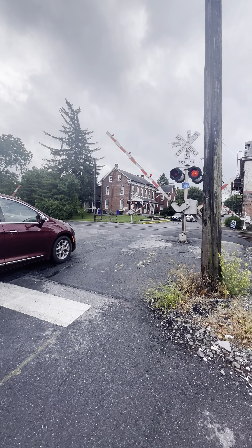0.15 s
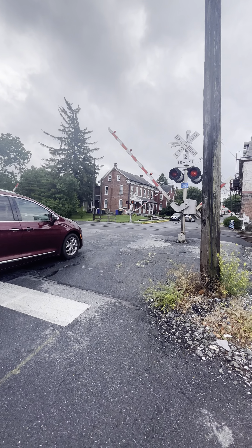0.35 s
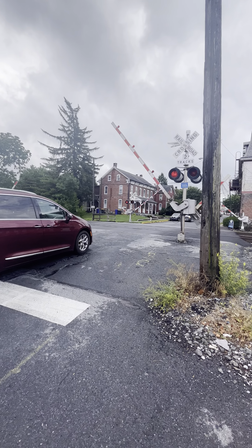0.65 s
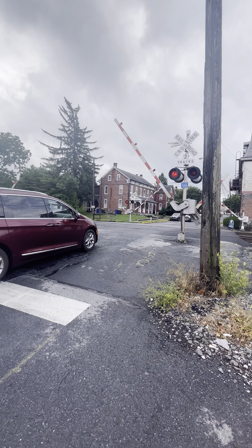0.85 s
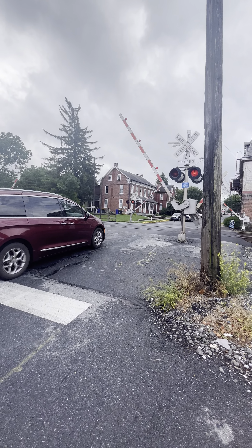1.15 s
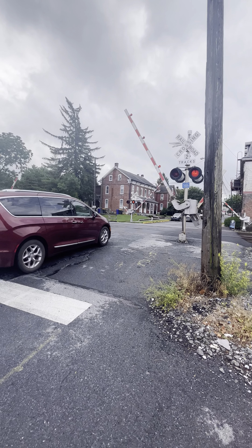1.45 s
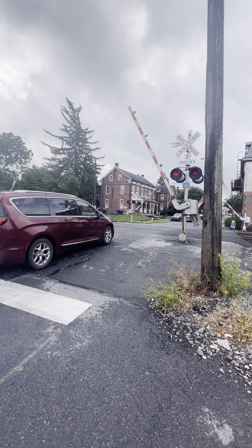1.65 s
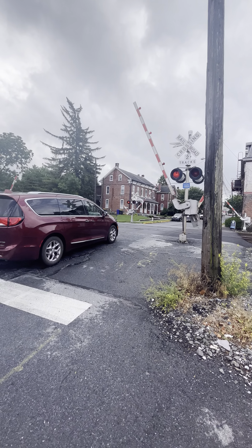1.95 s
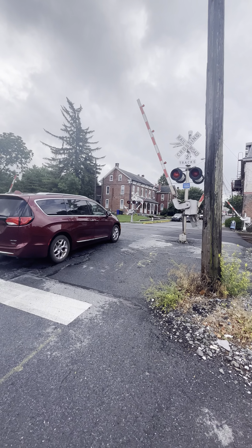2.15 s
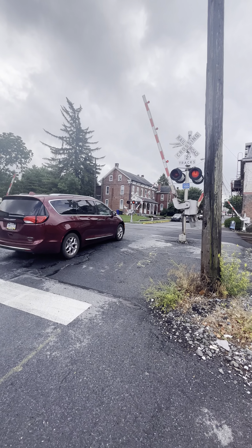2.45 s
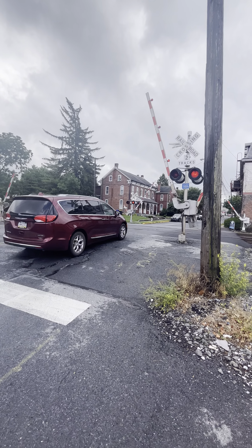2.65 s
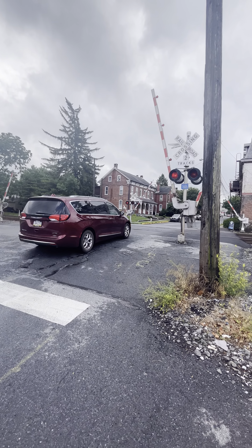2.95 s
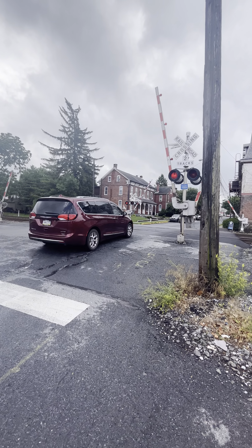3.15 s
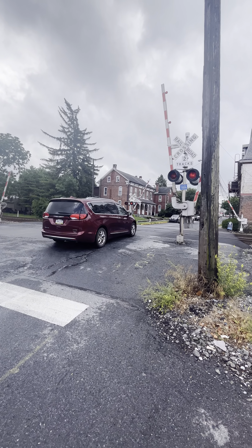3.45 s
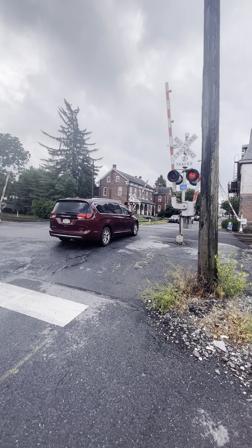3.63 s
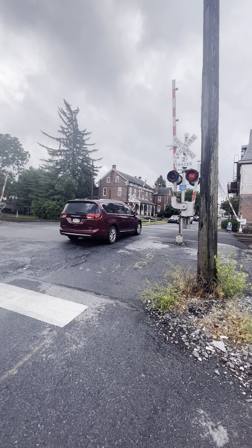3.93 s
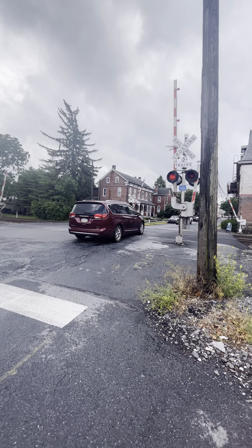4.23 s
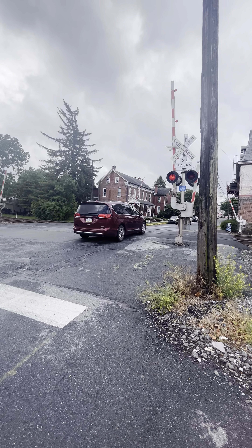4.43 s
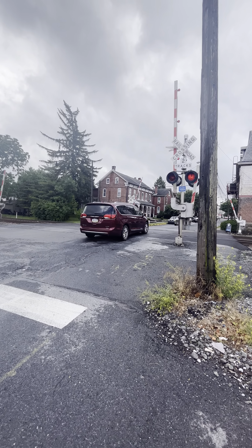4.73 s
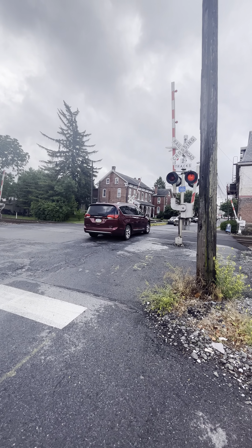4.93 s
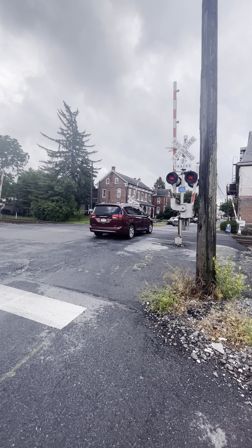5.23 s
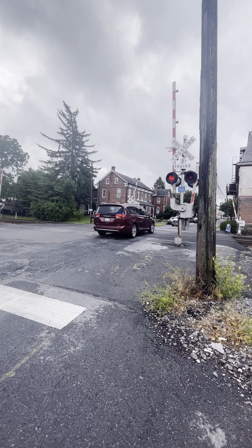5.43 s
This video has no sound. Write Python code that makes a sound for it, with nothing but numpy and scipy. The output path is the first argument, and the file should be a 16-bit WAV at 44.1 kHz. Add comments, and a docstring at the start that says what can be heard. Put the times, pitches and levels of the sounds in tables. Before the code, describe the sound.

A van pulls away over a damp level crossing with wet tyre hiss, low rumble and a throbbing engine, then gravel crunches close by.

```python
"""From the start, tyres roar and hiss on damp asphalt, low rumble and booms come from a crossing, a low note
near 62 Hz swells now and then, and a motor hums. Metal squeaks early, and again from about 3 to 3.8 s. At 1.7 s
a van pulls away, its firing note climbing, then fading. From then on an eight-cylinder engine pulls at low revs
beside a low drone, gas rushes softly, and grit ticks now and then. Near the end loose metal clinks twice and
gravel crunches once, close to the two microphone ports. Tyres and stones are shaped noise; engines, hum,
squeaks and rings are sine waves with small random changes."""
import sys
import numpy as np
from scipy import signal
from scipy.fft import rfft, irfft, next_fast_len
from scipy.io import wavfile
from scipy.ndimage import uniform_filter1d, map_coordinates

SR = 44100
rng = np.random.default_rng(int(sys.argv[2]) if len(sys.argv) > 2 else 0)


def to_wav(s):
    """Save 16-bit WAV."""
    ch = np.atleast_2d(s).T  # columns
    pcm = np.round(np.clip(ch, -1, 1) * 32767)  # PCM
    wavfile.write(sys.argv[1], SR, pcm.astype(np.int16))


N = 246078

# how the two ports hear each pitch:
# (frequency [Hz], left minus right [dB], likeness [0-1], left lead [rad])
PORT_HEARING = [(230, 0, .99, 0), (348, 2.5, .84, .35), (550, 4.2, .24, -.4), (950, 6.2, .33, -.7),
                (1400, 3.4, .77, -.87), (2100, 7.3, .46, -1.1), (2390, 4.6, .62, -1.7),
                (2900, -2.3, .8, -2), (3680, -2, .48, -2.3), (4300, 4, .38, -1.1), (5400, 4.9, .58, -2.6),
                (7020, 2.3, .64, -2.4), (9300, 0, .85, 0), (11100, 0, .98, 2.9), (13500, 0, .97, 3.3),
                (14600, 0, .9, 4.2)]
# the traffic moves off: when, and how long the throttles take to open
MOVE_OFF_S, THROTTLE_S = 1.7, 0.31


def amp(db):
    """Turn decibels into gain."""
    return 10 ** (np.asarray(db) / 20)


def unit(x):
    """Scale to rms 1."""
    return x / np.sqrt(np.mean(x ** 2) + 1e-20)


def clock():
    """The time of every sample, in seconds."""
    return np.arange(N) / SR


def progress():
    """0 at the start of the scene, 1 at its end."""
    return np.arange(N) / N


def throttle():
    """0 while the traffic idles, rising to 1 as it moves off."""
    return np.clip((clock() - MOVE_OFF_S) / THROTTLE_S, 0, 1)


def over_time(rows):
    """Join the (time, level) points of a table with straight lines."""
    return np.interp(clock(), *np.transpose(rows))


def along(rows, hz):
    """Read each column of a table on a log-frequency axis."""
    f, *columns = np.transpose(rows)
    return [np.interp(np.log(hz + 1), np.log(f + 1), column) for column in columns]


def wobble(rate):
    """A smooth random curve with `rate` knots a second."""
    steps = np.linspace(0, rate * N / SR, num=8192)
    curve = map_coordinates(rng.standard_normal(4096), [steps], mode="mirror")
    return np.interp(clock() * rate, steps, curve)


def filtered(x, response):
    """Multiply the spectrum of x by a response, a function of frequency."""
    size = next_fast_len(N + SR // 4)
    hz = np.fft.rfftfreq(size, 1 / SR)
    return irfft(rfft(x, size) * response(hz), size)[..., :N]


def below(hz, edge_hz, order=6):
    """Gain of a smooth low-pass."""
    return 1 / (1 + (hz / edge_hz) ** order)


def noise(spectrum):
    """Two unrelated noises of one colour, rms 1."""
    white = rng.standard_normal((2, N))
    return unit(filtered(white, lambda hz: amp(along(spectrum, hz)[0])))


def patchy(pair, depth_db):
    """Random patches of gain in time and frequency, as on an uneven road."""
    z = signal.stft(pair, nperseg=512)[2]
    field = rng.standard_normal(z.shape[1:])
    field = uniform_filter1d(field, size=5, axis=0)  # across frequency
    field = uniform_filter1d(field, size=16, axis=1)  # across time
    return signal.istft(z * amp(depth_db * unit(field)), nperseg=512)[1][:, :N]


def at_ports(pair):
    """Mix two noises into left and right: almost one in the bass, shaded and shifted by the housing higher up."""
    def hearing(hz, sign):
        balance_db, alike, lead = along(PORT_HEARING, hz)
        turn = np.arccos(np.clip(alike, 0, 1)) / 2  # mixing angle that gives this likeness
        mix = np.array([np.cos(turn), sign * np.sin(turn)])
        shade = amp(sign * balance_db / 2) / np.sqrt((amp(balance_db) + amp(-balance_db)) / 2)
        return shade * np.exp(sign * .5j * lead) * mix
    return np.array([filtered(pair, lambda hz: hearing(hz, sign)).sum(0) for sign in (1, -1)])


def tone(phase, lead, pan_db):
    """A tone of rms 1 at the two ports; lead and pan set it earlier and louder on the left."""
    gains = unit(amp(np.array([[pan_db], [-pan_db]]) / 2))
    return np.sqrt(2) * gains * np.sin([phase + lead / 2, phase - lead / 2])


def ringing(hz, width_hz, pan_db, size):
    """A fuzzy line of random phase, shifted between the ports by the housing."""
    fuzz_hz = width_hz * unit(uniform_filter1d(rng.standard_normal(size), size=24))
    turns = np.cumsum(hz + fuzz_hz) / SR + rng.random()
    return tone(2 * np.pi * turns, along(PORT_HEARING, hz)[2], pan_db)


def add_at(out, start_s, sound):
    """Add a short sound to the stereo track at its start time."""
    out[:, round(start_s * SR):][:, :sound.shape[1]] += sound


def contacts(rows, scrape, width_hz, attack_s, ring_pan_db):
    """Each stone contact is a dying burst of scrape plus the stone's own short ring."""
    out, t = np.zeros((2, N + SR)), np.arange(SR // 4) / SR
    for k, (start_s, db, ring_hz, ring_db, t60) in enumerate(rows):
        ring = ringing(ring_hz, width_hz, ring_pan_db, size=len(t))
        # t60 is the time to die away by 60 dB
        shape = np.exp(-np.log(1000) * t / t60) * (1 - np.exp(-t / attack_s))
        piece = np.roll(scrape, -k * len(t), axis=1)[:, :len(t)]
        add_at(out, start_s, amp(db) * shape * (piece + amp(ring_db) * ring))
    return out[:, :N]


def tyres(roar_db=-41.0, roar_gain_db=1.5, hiss_db=-44.5):
    """Tread roars on the asphalt as the traffic gathers speed, hisses on its damp grain and throws a fine spray."""
    # road noise: (frequency [Hz], relative level [dB])
    road_colour = [(150, 3), (290, -3), (380, -4), (440, -5), (480, -3.5), (540, -5.5), (760, -4.5),
                   (1100, -9), (1450, -7.5), (2100, -12.5), (2900, -10), (3800, -17), (5700, -18),
                   (7000, -26.5), (9000, -28)]
    # spray noise: (frequency [Hz], relative level [dB])
    spray_colour = [(4000, -18), (5800, 1), (6800, 0), (8000, -3), (9000, -7), (10000, -7.5), (11500, -12),
                    (13500, -16), (15000, -25)]
    # loudness of the spray: (time [s], level [dB])
    spray_level = [(0, -57), (.7, -58.5), (1.1, -60), (1.8, -61), (2.2, -59), (3.6, -59.5), (4.2, -61.5),
                   (5.58, -60.5)]
    road = at_ports(patchy(noise(road_colour), depth_db=0.88))
    roar = filtered(road, lambda hz: below(hz, 1213) * (1 - below(hz, 156)))
    hiss = filtered(road, lambda hz: below(hz, 7360) - below(hz, 1153))
    spray = at_ports(patchy(noise(spray_colour), depth_db=2.0))
    roar_gain = amp(roar_db + roar_gain_db * progress())
    return roar_gain * unit(roar) + amp(hiss_db) * unit(hiss) + amp(over_time(spray_level)) * unit(spray)


def howl(start_db=-59, end_db=-48):
    """The wedge between tread and road beams its howl along the lane, so it grows as the van turns its tail."""
    # tread howl: (frequency [Hz], relative level [dB])
    howl_colour = [(450, -25), (650, -7), (725, 17.5), (795, 20.5), (890, 7), (1100, -27)]
    level_db = start_db + (end_db - start_db) * progress() ** 2
    return amp(level_db) * at_ports(noise(howl_colour))


def rumble(idle_db=-38.6, moving_db=-38.0, waver_db=2.0, drift_rad=0.6):
    """Bodies and wheels drone low, slightly louder once they move off, and boom as they roll over the crossing;
    a low note near 62 Hz swells and fades about every two seconds."""
    # low noise: (frequency [Hz], relative level [dB])
    rumble_colour = [(18, -29), (33, -11), (39, 2), (50, -3.5), (64, -0.5), (78, .5), (95, -2), (120, -3.5),
                     (160, -7), (220, -9.5), (290, -27.5), (450, -70)]
    # gain of its upper half, strong while the van is on the rails: (time [s], level [dB])
    upper_level = [(0, -4), (1, 2), (1.6, -1), (2.2, 3.5), (3.4, 2.5), (4.1, -3.5), (5.58, -3.5)]
    # booms on the crossing, and slow swells near 62 Hz about two seconds apart: (time of the peak [s],
    # frequency [Hz], level [dB], length each way [s])
    boom_rows = [(0.75, 145, -41, .045), (0.96, 62, -33.5, 0.045), (0.97, 136, -41, 0.08),
                 (2.1, 147, -41, .05), (2.123, 57, -38, 0.089), (2.52, 147, -42, .04),
                 (2.896, 62, -34, 0.085), (3.036, 152, -38, 0.05), (3.53, 149, -37, .07),
                 (3.83, 150, -39, .04), (4.04, 150, -39, .05), (4.71, 158, -36.5, .04),
                 (4.78, 61.8, -35.5, 0.11), (4.91, 160, -37, .055), (5.3, 158, -39.5, .045),
                 (5.52, 52, -35, 0.14)]
    level_db = idle_db + (moving_db - idle_db) * throttle() + waver_db * wobble(4.945)
    roll = amp(level_db) * at_ports(noise(rumble_colour))
    deep = filtered(roll, lambda hz: below(hz, 172))
    upper = (roll - deep) * amp(over_time(upper_level))
    t = clock()
    booms = np.zeros(N)
    for peak_s, hz, db, length_s in boom_rows:
        swell = np.exp(-.5 * ((t - peak_s) / length_s) ** 2)
        booms += amp(db) * swell * np.sin(2 * np.pi * hz * t + drift_rad * wobble(16))
    return deep + upper + np.sqrt(2) * booms


def van(idle_db=-51, pulling_db=-28.0, waver_db=2, drift_rad=0.38):
    """The muffled exhaust leaves only its firing note, which swells and climbs on pulling away, then fades with distance."""
    idle_hz, cruise_hz, climb_s = 38.66, 52, 0.493  # firing rates; time constant of the climb
    start_m, speed_m_per_s = 2.6, 6.4  # distance as it moves off, then its speed
    driving_s = np.maximum(clock() - MOVE_OFF_S, 0)
    firing_hz = cruise_hz - (cruise_hz - idle_hz) * np.exp(-driving_s / climb_s)
    nearness = start_m / (start_m + speed_m_per_s * driving_s)
    level_db = idle_db + (pulling_db - idle_db) * throttle() + waver_db * wobble(11.0)
    phase = 2 * np.pi * np.cumsum(firing_hz) / SR + drift_rad * wobble(13)
    return np.sqrt(2) * nearness * amp(level_db) * np.sin(phase)


def tailpipe(rush_db=-49.0):
    """Exhaust gas rushes softly, fading in as the van turns its tail to the kerb."""
    # gas noise: (frequency [Hz], relative level [dB])
    gas_colour = [(220, -34), (300, -4), (380, 6), (440, -13), (600, -42.5)]
    # the tailpipe comes round into view: (from [s], to [s])
    turn_times = (2, 2.66)
    return amp(rush_db) * np.interp(clock(), turn_times, [0, 1]) * at_ports(noise(gas_colour))


def effort():
    """Each pull swells, holds and dies back; the strongest sets the loudness and stronger pulls weigh more in the firing rate."""
    # engine pulls: (start of hold [s], hold [s], level before the engine's gain [dB], firing rate [Hz])
    pull_rows = [(1.872, 0.09, -32.5, 97.6), (2.09, .06, -34, 97.2), (2.37, .1, -30.5, 95.8),
                 (2.53, 0.17, -28, 96.3), (3.02, 2.45, -35, 97.5), (3.28, 0.23, -30.2, 97.8),
                 (3.65, .07, -28.7, 97.8), (4.42, .05, -32.5, 97.5), (4.77, 0.56, -31.8, 98.8),
                 (4.87, .09, -29, 98.9)]
    attack_s, release_s = 0.093, 0.079  # time constants
    idle_db, idle_hz = -48.5, 96.3  # the same engine between pulls
    t = clock()
    gains, rates_hz = [np.full(N, amp(idle_db))], [idle_hz]
    for start_s, hold_s, db, hz in pull_rows:
        rise = np.minimum(t - start_s, 0) / attack_s
        fall = np.maximum(t - start_s - hold_s, 0) / release_s
        gains.append(amp(db) * np.exp(rise - fall))
        rates_hz.append(hz)
    gains = np.array(gains)
    power = gains ** 2
    return gains.max(0), np.array(rates_hz) @ power / power.sum(0)


def engine(gain_db=2.1, waver_db=1.0, jitter=0.0025, side_share=0.66, cruise_db=-33):
    """Uneven exhaust pulses give lines at multiples of the cycle; the firing line follows pulls fully, the others in part."""
    # exhaust lines: (multiple of the eight-firing cycle, relative level [dB])
    exhaust_lines = [(5, -19.5), (8, 0.5), (12, -12), (13, -16), (16, -13.5), (25, -27), (27, -26.5),
                     (30, -26.5), (32, -27)]
    strength, firing_hz = effort()
    cycle = np.cumsum(firing_hz * (1 + jitter * wobble(9))) / SR / 8
    side_strength = amp(cruise_db) * (strength / amp(cruise_db)) ** side_share
    lines = np.zeros(N)
    for multiple, db in exhaust_lines:
        follow = strength if round(multiple) == 8 else side_strength  # 8 is the firing line
        wave = np.sin(2 * np.pi * (multiple * cycle + rng.random()))
        lines += follow * amp(db + waver_db * wobble(7)) * wave
    return amp(gain_db) * lines


def gravel(grain_db=2.0):
    """Gravel gives way in a quick run of slips, each made of tiny catches."""
    # slips underfoot: (time [s], level [dB], ring [Hz], ring over scrape [dB], t60 [s])
    slips = [(5.217, -39, 2690, -4, .034), (5.231, -40, 2850, -5, 0.05), (5.2455, -43, 2950, 6, 0.016),
             (5.2575, -44, 2650, 5, 0.079), (5.2648, -35, 2420, 4, .03), (5.269, -37, 2400, 3, .025),
             (5.2705, -43, 7000, 5, .015), (5.277, -32.5, 2430, 6, .024), (5.2802, -39, 5600, 4, .018),
             (5.2815, -33.5, 2900, 5, .03), (5.2835, -37, 2300, 4, .02), (5.2875, -40, 7400, 6, .012),
             (5.29, -29.5, 2560, 9, .02), (5.2975, -31.5, 2900, -1, .035), (5.3025, -34, 2250, 2, .025),
             (5.307, -32, 2850, 1, .035), (5.3085, -38, 6250, 5, .018), (5.3095, -36, 4500, 6, .016),
             (5.3123, -31, 3120, 10, .03), (5.3165, -36, 6250, 3, .02), (5.3178, -34, 2500, -4, .024),
             (5.352, -40.5, 2700, 0, .045), (5.364, -39.5, 3200, -7, .035), (5.397, -37, 2300, 1.5, .026)]
    # scraping stones: (frequency [Hz], relative level [dB])
    stone_colour = [(1200, -16), (2300, 5), (3600, 0), (4600, -0.5), (6500, 1), (8500, -9.5), (12000, -18),
                    (15000, -39)]
    catches = unit(amp(grain_db * wobble(700)) * at_ports(noise(stone_colour)))
    return contacts(slips, catches, width_hz=220, attack_s=0.0008, ring_pan_db=-6.0)


def squeaks(rough_db=2.4, jitter=0.0025, settle_s=0.055):
    """Metal sticks and slips for a moment on one high mode, some squeaks sliding onto it, the pitch trembling."""
    # thin squeaks, level before the roughness: (time [s], length [s], pitch [Hz], level [dB],
    # starting offset [share of pitch], left minus right [dB], left lead [rad])
    squeak_rows = [(.469, .033, 10020, -51.5, 0, -1, .8), (.480, .021, 9890, -52, 0, -1, .8),
                   (3.018, .088, 3040, -47.5, -.008, 0, -3), (3.018, .08, 5410, -54.5, 0, 4, -2.8),
                   (3.025, .05, 6690, -59.5, 0, 1, -2.4), (3.176, .042, 3120, -49, 0, -8, -2.1),
                   (3.185, .075, 7490, -62, .004, -3, -1.5), (3.27, .028, 3165, -45.5, 0, -9, -2.1),
                   (3.54, .085, 4010, -58.5, -.012, 8, .8), (3.552, .052, 7990, -56.5, 0, 3, -1.4),
                   (3.638, .068, 2895, -49, .058, -6, -1.6), (3.695, .06, 2865, -44.5, .014, -6, -1.6),
                   (3.745, .083, 2855, -49, .004, -3, -1.6)]
    out, t = np.zeros((2, N + SR)), np.arange(SR // 4) / SR
    tremble = jitter * wobble(300)
    for k, (start_s, length_s, hz, db, offset, pan_db, lead) in enumerate(squeak_rows):
        swell = np.sqrt(np.abs(np.sin(np.pi * np.clip(t / length_s, 0, 1))))
        slide = offset * np.exp(-t / settle_s)
        pitch_hz = hz * (1 + slide + tremble[k * len(t):][:len(t)])
        phase = 2 * np.pi * np.cumsum(pitch_hz) / SR
        add_at(out, start_s, amp(db) * swell * tone(phase, lead, pan_db))
    return out[:, :N] * amp(rough_db * wobble(120))


def clink(attack_s=.0015, width_hz=240):
    """Each touch rings all the modes of a small loose piece of metal anew, blurred by its chatter."""
    # two touches: (time [s], level [dB])
    touches = [(5.164, -44.5), (5.174, -48)]
    # modes of the metal: (frequency [Hz], relative level [dB], t60 [s])
    metal_modes = [(6920, 2, 0.072), (8730, -2.5, 0.095), (8970, -1, 0.065), (10100, -8, 0.1),
                   (12300, -11, .06)]
    out, t = np.zeros((2, N + SR)), np.arange(SR // 4) / SR
    for start_s, db in touches:
        ring = np.zeros((2, len(t)))
        for hz, mode_db, t60 in metal_modes:
            ring += amp(mode_db - 60 * t / t60) * ringing(hz, width_hz, 0, size=len(t))
        add_at(out, start_s, amp(db) * (1 - np.exp(-t / attack_s)) * ring)
    return out[:, :N]


def grit():
    """Single pinched grains snap brightly."""
    # sharp ticks: (time [s], level [dB], ring [Hz], ring over scrape [dB], t60 [s])
    grains = [(2.737, -44.5, 8000, -7, .03), (3.048, -51, 8500, -5, .08), (3.905, -51.5, 6800, -3, .08),
              (4.4145, -40, 11800, -1, .05), (4.419, -48, 6100, 1, .04)]
    # snapping grain: (frequency [Hz], relative level [dB])
    tick_colour = [(1500, -24), (4000, -7), (6200, 5), (8000, 1), (10500, -2), (12500, -10), (15500, -20)]
    return contacts(grains, noise(tick_colour), width_hz=780, attack_s=0.00038, ring_pan_db=5.5)


def drone(waver_db=2.0, drift_rad=0.42, note_hz=85.6):
    """A second low note builds as the traffic gets under way and throbs against the engine's firing line."""
    # loudness before the waver: (time [s], level [dB])
    drone_level = [(0, -50), (1.6, -48), (2, -43), (2.9, -46), (3.4, -39.5), (4.1, -38), (4.6, -41.5),
                   (5.1, -39.5), (5.58, -44)]
    level_db = over_time(drone_level) + waver_db * wobble(7)
    phase = 2 * np.pi * note_hz * clock() + drift_rad * wobble(5.5)
    return np.sqrt(2) * amp(level_db) * np.sin(phase)


def hum(waver_db=1.97, drift_rad=0.51):
    """A small motor's steady lines flutter in level and phase on their way through the open air."""
    # motor lines, level before flutter and balance: (frequency [Hz], level [dB])
    motor_lines = [(230.7, -48), (691.9, -55), (923, -62.5), (988, -63.5), (1382, -64.5), (1613, -66.5)]
    lines = np.zeros(N)
    for hz, db in motor_lines:
        phase = 2 * np.pi * hz * clock() + drift_rad * wobble(7)
        lines += amp(db + waver_db * wobble(9)) * np.sin(phase)
    return np.sqrt(2) * lines * amp([[.6], [-.6]])  # a little louder on the left


def scene():
    """Add up everything in the open street."""
    road = tyres() + howl() + rumble()
    engines = van() + tailpipe() + engine() + drone() + hum()
    small_sounds = gravel() + squeaks() + clink() + grit()
    return road + engines + small_sounds


def record(dry):
    """The recorder keeps nothing at or above its band limit."""
    top_hz = 15400
    return filtered(dry, lambda hz: hz < top_hz)


dry = scene()
out = record(dry)
to_wav(out)
```